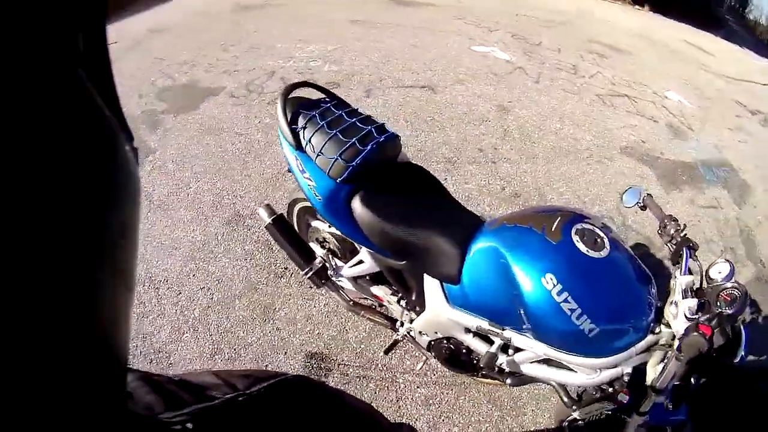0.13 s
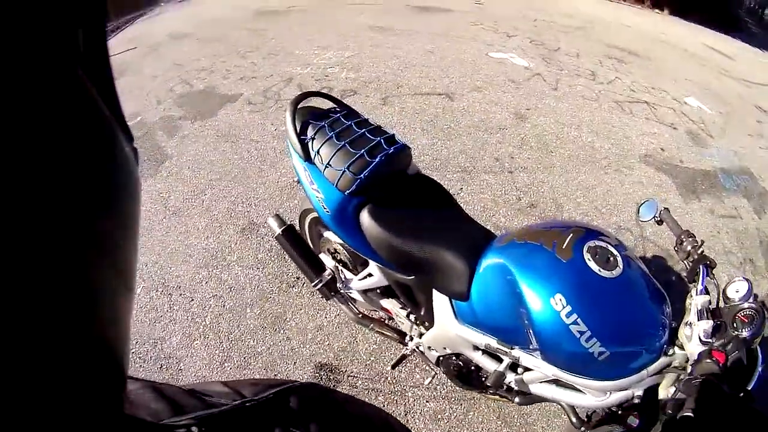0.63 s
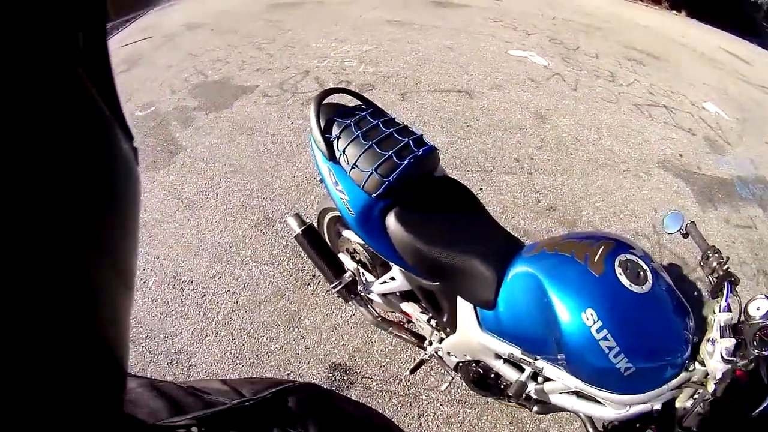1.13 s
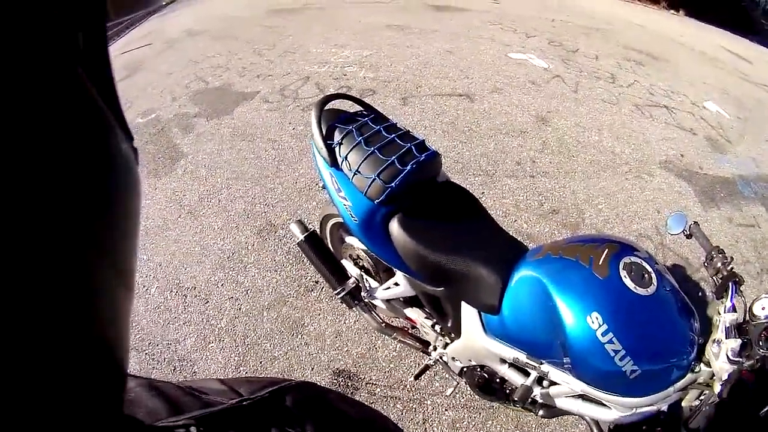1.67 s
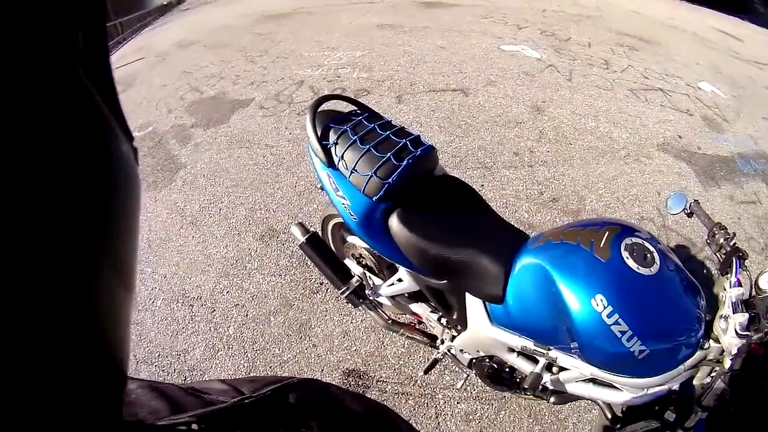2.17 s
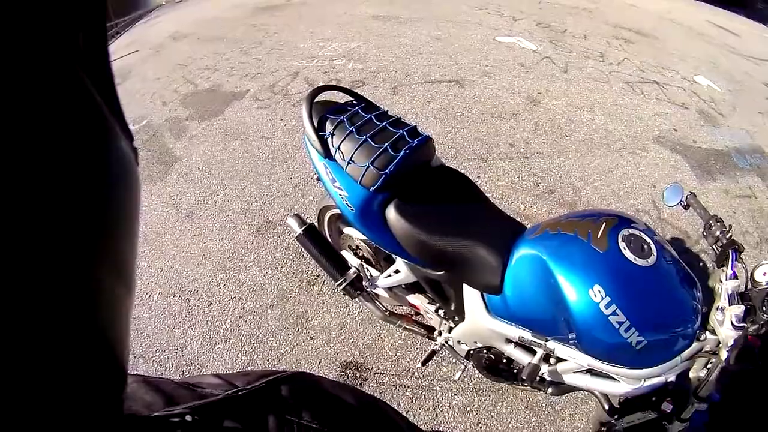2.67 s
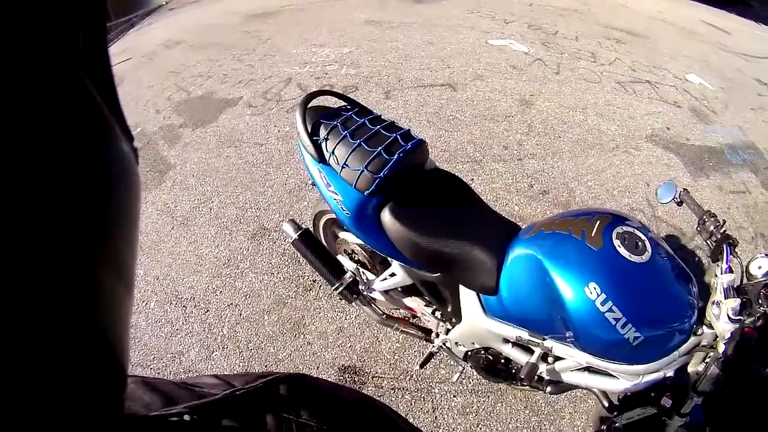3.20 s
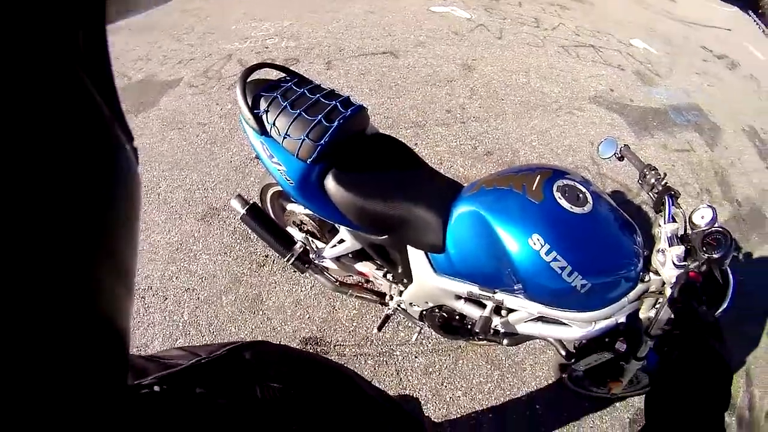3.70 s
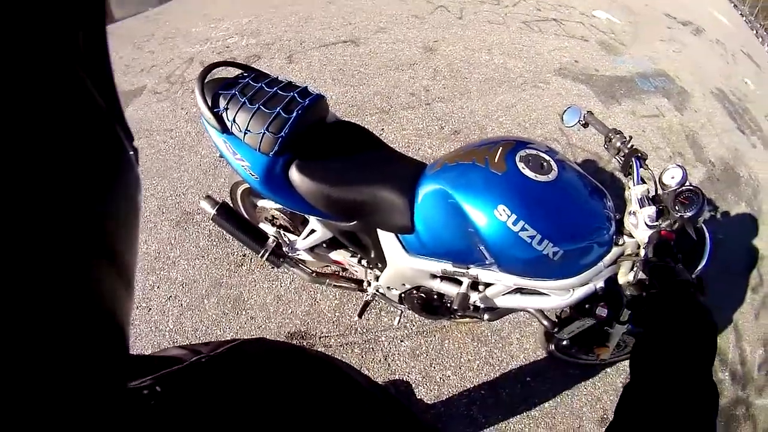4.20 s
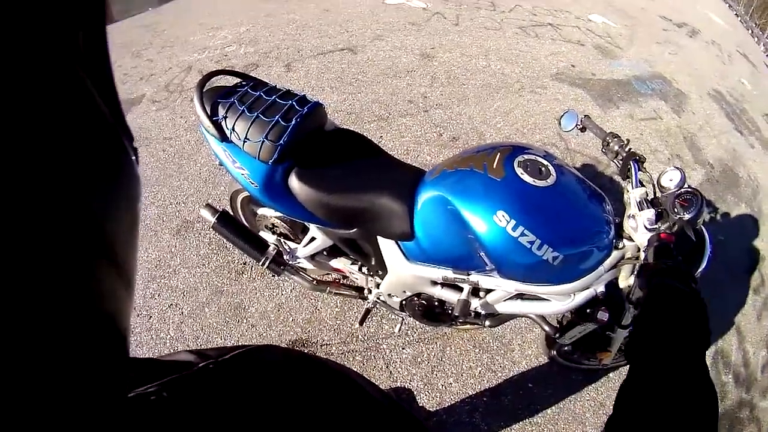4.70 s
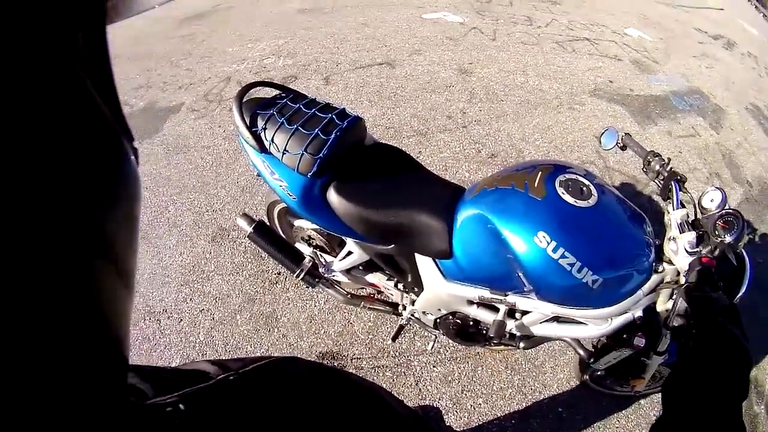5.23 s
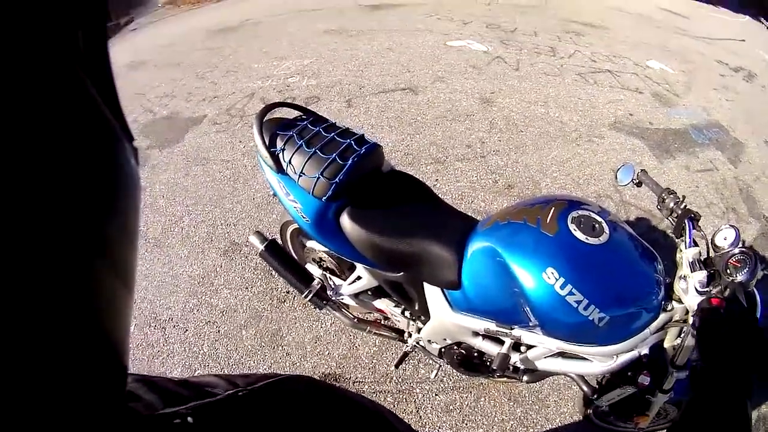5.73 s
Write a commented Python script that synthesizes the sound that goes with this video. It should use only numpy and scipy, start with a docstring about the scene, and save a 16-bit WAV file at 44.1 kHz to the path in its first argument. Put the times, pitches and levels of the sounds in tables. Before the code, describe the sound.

A parked V-twin motorcycle idles with a lumpy open-exhaust rumble, is revved in four sharp blips, and falls back to slow thumping idle.

```python
"""Parked V-twin motorcycle

Heard from beside the seat, an open exhaust idles, is blipped four times and falls back.
The two cylinders fire unevenly; each sends a puff down the pipe that rebounds, echoes and rings pipe and can.
Shaped noise makes the gas rush and burble after each puff, random ticks the valve gear, resonance the case rasp.
Still outdoor air lies beneath, and the small recorder clips the loud puffs flat."""
import sys
import numpy as np
from scipy import signal
from scipy.fft import rfft, irfft
from scipy.io import wavfile
from scipy.ndimage import uniform_filter1d

SR = 44100
rng = np.random.default_rng(int(sys.argv[2]) if len(sys.argv) > 2 else 0)


def store_pcm(level_fs):
    """Save levels as 16-bit WAV."""
    pcm = np.round(np.clip(level_fs, -1, 1) * 32767).astype(np.int16)
    wavfile.write(sys.argv[1], SR, np.atleast_2d(pcm).T)


def gain_from_db(level_db):
    """Turn a decibel level (scalar or array-like) into a linear amplitude factor."""
    decades = np.asarray(level_db, float) / 20
    return 10 ** decades


N = 258602  # length in samples


def coloured(points, x):
    """Spectral shaping: x filtered to the (f/Hz, level/dB) points, then normalised to rms 1."""
    hz, db = np.transpose(points)
    f = np.arange(N // 2 + 1) * SR / N + 1
    gain = gain_from_db(np.interp(np.log(f), np.log(hz), db, left=-90))
    y = irfft(rfft(x) * gain, N)
    return y / y.std()


def ring(x, hz, width_hz):
    """Modal resonance: a click excites one decaying sine; a wider mode dies sooner."""
    pole = np.exp((2j * np.pi * hz - np.pi * width_hz) / SR)
    return signal.lfilter([0, pole.imag], [1, -2 * pole.real, abs(pole) ** 2], x)


def lay(s, size, width_s, shape, count=900):
    """Superposition: the sum of pulses size * shape(time / width_s) placed at the times s."""
    at = np.round(s * SR).astype(int)[:, None] + np.arange(-count // 3, count)
    wave = size[:, None] * shape((at / SR - s[:, None]) / width_s[:, None])
    inside = (at >= 0) & (at < N)
    return np.bincount(at[inside], wave[inside], N)


# discrete reflections from ground and pipe ends:
# (delay/ms for a puff 1 ms wide, front level/dB, rear level/dB)
ECHOES = [(3.29, -9.5, -7.5), (4.96, -21.5, -10), (8.22, -14.5, -17), (16.95, -14.5, -26.5)]
# pipe modes driven by the gas volume: (f/Hz, bandwidth/Hz, level/dB)
PIPE_MODES = [(48.5, 8.6, -3.5), (82.7, 13, -8.5), (110.8, 22, -8)]
# can modes struck by a short pulse just after each dip's lowest point: (f/Hz, bandwidth/Hz, level/dB)
CAN_MODES = [(242.4, 20, 7), (338.3, 64, 20), (448, 56.3, 22.5), (543, 105, 17.5), (646, 105, 22.5),
             (770, 176, 17.5), (1147, 333, 25), (1490, 174, 18), (2500, 250, 20.5)]
# differences between the cylinders, throttle shut: (cycle rate f/Hz, front can drive level/dB,
# rear can drive level/dB, added rear rebound level/dB, echo gain level/dB)
SIDES_SHUT = [(8.8, -1.5, -13, -0.5, 6), (13, -12, -14, -10, 3), (16, -2, -9, 6, 0.5),
              (20.8, -5.5, -10, -4, 4), (23.6, -3, -1, 7, 3.5), (28.3, 2.95, -18.5, -6.5, -5.3),
              (36.2, -3.5, -7, 5.7, 1.7), (46.2, 2.2, -1, 1.5, -0.2)]
# the same columns, throttle open
SIDES_OPEN = [(15, 0.11, -5, .1, .1), (35, 1.2, -7.5, .1, .1), (54, .1, 2, 2.3, 0.092)]


def exhaust(s, db, width_ms, rebound_db, volume_db, rear):
    """Pulse radiation and reflection: each puff is a dip and steep rebound that echoes and excites modes."""
    width_s = np.clip(width_ms, .1, 3) / 1000
    front_can_db, rear_can_db, rear_rebound_db, echo_db = engine_map(SIDES_SHUT, SIDES_OPEN, s)
    rebound = gain_from_db(rebound_db + rear * rear_rebound_db)[:, None]

    def bump(u, after):
        """Gaussian pulse of width 1 before its peak and `after` behind it."""
        return np.exp(-.5 * (u / np.where(u > 0, after, 1)) ** 2)

    def dip(u):
        """Rarefaction: a negative pulse that recovers more slowly than it falls."""
        return -bump(u, 2.04)

    def puff(u):
        """Pressure rebound: the dip is cut off by a later positive pulse."""
        return dip(u) + rebound * bump(u - 2.79, 1.74)

    def strike(u):
        """Impulsive excitation: a short pulse just after the dip's lowest point strikes the can."""
        return -bump(3 * (u - .6), 1)

    out = lay(s, gain_from_db(db), width_s, puff)
    for delay_ms, front_db, rear_db in ECHOES:
        # short puffs are hot puffs: sound runs faster and the echoes come sooner
        delay_s = delay_ms / 1000 * (1000 * width_s) ** 0.11
        level_db = db + echo_db + np.where(rear, rear_db, front_db)
        out += lay(s + delay_s, gain_from_db(level_db), width_s, puff)

    can_db = noise_levels(s)[0] + throttle(s)[1] + misfire_db(s)
    can_db = can_db + np.where(rear, rear_can_db, front_can_db)
    can_drive = lay(s, gain_from_db(can_db), width_s, strike) * 1000 / SR
    # dividing by the width makes the drive follow the gas volume
    volume = gain_from_db(volume_db) / (width_s * np.sqrt(2 * np.pi) * SR)
    pipe_drive = lay(s, volume, width_s, dip)
    for drive, modes in [(can_drive, CAN_MODES), (pipe_drive, PIPE_MODES)]:
        for hz, width_hz, mode_db in modes:
            out -= gain_from_db(mode_db) * ring(drive, hz, width_hz)
    return out


# mean puffs, throttle shut: (cycle rate f/Hz, front level/dB, rear level/dB, width/ms,
# rebound level/dB, gas volume level/dB)
PUFF_SHUT = [(7.24, -36.5, -28.5, 1, -2.5, -36.5), (9.17, -30.5, -34.5, 0.72, -10, -33.5),
             (11.1, -27.5, -31, 0.76, -47, -37.5), (14.3, -25, -26.5, 1.22, -4, -39),
             (19.44, -24, -23.5, 1.18, -14.5, -28.5), (22.4, -18.5, -23.5, 0.55, -20.5, -28.5),
             (26.6, -15.5, -27, 0.7, -6.5, -44.5), (35.6, -15.5, -17, 0.55, -9.5, -39),
             (43.45, -15.5, -14.5, 0.45, -4, -49), (51.9, -11, -12, 0.33, -7.5, -51)]
# the same columns, throttle open
PUFF_OPEN = [(12, -17, -5.5, 0.27, -11, -39), (21.6, -7, -11, 0.34, -5, -30.5),
             (29.3, -10, -13, .31, -1, -32.5), (40, -9, -17.5, 0.26, 3, -32.5),
             (58.3, -17, -6, 0.31, -6.5, -27)]
# puff timing: (cycle rate f/Hz, lag behind the crank with throttle shut/ms,
# share of the cycle to the rear puff when shut/0-1, when open/0-1)
TIMING = [(7, 2.4, .3, .39), (9, 1.2, .36, .39), (14, 1.2, .4, .37), (17.5, 3.5, .345, .367),
          (21, 1.2, .395, .367), (28, 1.2, .39, .392), (33, 1.2, .358, .385), (53, 1.2, .348, .348)]
# puffs off the beat while the throttle snaps shut: (t/s, level/dB, width/ms, rebound level/dB)
POPS = [(1.038, -18, 0.4, -6), (1.0543, -15.5, 0.33, -4.5), (1.0685, -20, 1, -17), (1.588, -11.5, 0.58, 1),
        (1.5929, -17.5, 0.17, -20), (1.611, -14.5, 0.29, 2), (4.736, -21, 0.35, -2.5)]
FIRST_CYCLE = -.085  # engine cycles
STUMBLE_AFTER_S, STUMBLE_S, STUMBLE_WIDTH_MS = 0.029, .011, 0.46  # delay, Gaussian spread, widening
SCATTER_SHUT_DB, SCATTER_OPEN_DB = .5, 2.2  # standard deviations


def firings():
    """Uneven firing: rows (t/s, level/dB, width/ms, rebound/dB, gas volume/dB, rear 0-1) from crank phase."""
    t = np.arange(-SR // 100, N) / SR
    cycles = FIRST_CYCLE + np.cumsum(crank_speed(t)) / SR
    # the front fires on each whole cycle, the rear a share of a cycle later
    whole = np.arange(int(cycles[-1]) + 1)
    front = np.interp(whole, cycles, t)
    lag_ms, shut_share, open_share = by_speed(TIMING, front)
    opened = throttle(front)[0]
    rear_share = shut_share + opened * (open_share - shut_share)
    rear = np.interp(whole + rear_share, cycles, t, right=2 * t[-1])
    s = np.r_[front, rear] + np.tile(lag_ms * (1 - opened), 2) / 1000
    is_rear = np.arange(len(s)) >= len(front)

    front_db, rear_db, width_ms, rebound_db, volume_db = engine_map(PUFF_SHUT, PUFF_OPEN, s)
    opened, strength_db = throttle(s)
    db = np.where(is_rear, rear_db, front_db) + strength_db + misfire_db(s)
    # starved of air just after the throttle shuts, the burns go weak and soft
    for _, shuts, _, front_dip_db, rear_dip_db in BLIPS:
        starved = np.exp(-.5 * ((s - shuts - STUMBLE_AFTER_S) / STUMBLE_S) ** 2)
        db = db + starved * np.where(is_rear, rear_dip_db, front_dip_db)
        width_ms = width_ms + starved * STUMBLE_WIDTH_MS

    # no two burns are quite alike, least so under throttle
    beat = np.c_[s, db, width_ms, rebound_db, volume_db, is_rear]
    spread = SCATTER_SHUT_DB + opened * (SCATTER_OPEN_DB - SCATTER_SHUT_DB)
    column_scale = [.00004, 1, .015, 1, 1, 0]  # s, dB, ms, dB, dB per dB of spread
    beat = beat + rng.standard_normal(beat.shape) * spread[:, None] * column_scale
    # stray puffs carry too little gas to ring the pipe
    pops = np.c_[POPS, np.full(len(POPS), -np.inf), np.zeros(len(POPS))]
    return np.r_[beat, pops]


# single weak burns: (t/s, level/dB)
MISFIRES = [(1.033, -6), (1.325, -3.5), (2.505, -7), (3.537, -1.5), (3.59, -11), (4.707, -6.5),
            (4.782, -8.5), (5.43, -10)]
MISFIRE_S = .008  # Gaussian spread


def misfire_db(s):
    """Incomplete combustion: level change of burns at the times s near each misfire."""
    return sum(weak_db * np.exp(-.5 * ((s - at) / MISFIRE_S) ** 2) for at, weak_db in MISFIRES)


# throttle blips: (opening t/s, shutting t/s, strength level/dB,
# front stumble after shutting level/dB, rear stumble level/dB)
BLIPS = [(0.775, 1.008, -0.08, -29, -10.5), (1.339, 1.57, 0.2, -4, -33), (2.566, 2.848, -0.11, -5, -19),
         (4.43, 4.722, 0.054, -6.5, -7)]
OPEN_S, SHUT_S = .06, .04  # ramp durations


def throttle(s):
    """Piecewise-linear control: throttle opening (0-1) and blip strength in dB at the times s."""
    opened, strength_db = 0, 0
    for opens, shuts, blip_db, *_ in BLIPS:
        ramp = np.clip((s - opens) / OPEN_S, 0, 1) * np.clip(1 + (shuts - s) / SHUT_S, 0, 1)
        opened = opened + ramp
        strength_db = strength_db + ramp * blip_db
    return opened, strength_db


# crank speed, one engine cycle being two turns: (t/s, cycle rate f/Hz)
SPEED = [(-0.01, 8.856), (0.174, 9.314), (0.309, 8.632), (0.779, 8.769), (1.019, 38.834), (1.073, 36.968),
         (1.349, 28.806), (1.565, 55.056), (1.673, 52.985), (2.021, 36.487), (2.435, 19.459),
         (2.606, 15.992), (2.824, 46.219), (2.921, 45.583), (3.366, 26.468), (3.577, 18.353),
         (3.85, 10.365), (4.007, 6.583), (4.074, 8.886), (4.44, 9.496), (4.642, 36.24), (4.716, 43.639),
         (4.824, 42.059), (5.221, 25.5), (5.426, 17.902), (5.87, 6.169)]


def crank_speed(s):
    """Firing periodicity: engine cycles per second, interpolated at the times s."""
    return np.interp(s, *np.transpose(SPEED))


def by_speed(table, s):
    """Speed dependence: columns of a table read at the crank speed of the times s."""
    hz, *columns = np.transpose(table)
    speed = crank_speed(s)
    return np.array([np.interp(speed, hz, column) for column in columns])


def engine_map(shut, wide, s):
    """Load dependence: the shut and open tables blended by throttle opening."""
    opened = throttle(s)[0]
    return (1 - opened) * by_speed(shut, s) + opened * by_speed(wide, s)


# engine levels, throttle shut: (cycle rate f/Hz, can drive level/dB, gas rush level/dB, valve gear level/dB)
NOISE_SHUT = [(7, -82, -100, -87), (9.4, -78, -102, -88), (15, -56.5, -79, -83),
              (20.6, -51.5, -73.5, -79.5), (26.5, -50.5, -72, -75.5), (38.3, -42.5, -64, -69.5),
              (53, -48, -66, -63)]
# the same columns, throttle open
NOISE_OPEN = [(12, -32.5, -81, -66), (21.4, -43.5, -63.5, -83), (30.8, -36.5, -46, -72),
              (37, -38.5, -52, -90), (50, -35.5, -46, -71.5)]


def noise_levels(s):
    """Source strength by speed and load: can drive, gas rush and valve gear in dB."""
    return engine_map(NOISE_SHUT, NOISE_OPEN, s)


# relative spectrum of the gas rush: (f/Hz, level per Hz/dB)
RUSH = [(300, -16), (600, -8), (1000, -6), (1400, 0), (2000, -6), (2700, -6), (5000, -18), (9000, -26),
        (14000, -38)]
RUSH_SCATTER_DB = 3.1  # standard deviation from puff to puff, for rush and burble


def gas(s, db, level_db, decay_s=.004, steady=.1):
    """Turbulent jet noise: a rush bursts out behind each puff and decays exponentially."""
    size = gain_from_db(db + RUSH_SCATTER_DB * rng.standard_normal(len(s)))
    gate = lay(s, size, np.full(len(s), decay_s), lambda u: (u > 0) * np.exp(-np.abs(u)))
    gate /= np.sqrt(uniform_filter1d(gate ** 2, SR // 8)) + 1e-6  # even out the running rms
    return gain_from_db(level_db) * (gate + steady) * coloured(RUSH, rng.standard_normal(N))


# relative spectrum of the burble: (f/Hz, level per Hz/dB)
BURBLE = [(120, -12), (200, 1), (330, 7), (500, -1), (700, -3.5), (1000, -15.5), (1500, -18.5), (2200, -50)]
# burble level, throttle shut: (cycle rate f/Hz, level/dB)
BURBLE_SHUT = [(7, -56), (9, -57), (13, -53), (17, -49.5), (21, -51), (27, -53), (38, -49.5), (53, -56.5)]
BURBLE_OPEN_DB = -43.5  # at every speed
BURBLE_ATTACK_S, BURBLE_DECAY_S = .0015, 0.028


def burble(s, rear, t, rear_db=-5):
    """Low-frequency turbulence: gas swirl rolls on in the can after each puff."""
    level_db = engine_map(BURBLE_SHUT, [(9, BURBLE_OPEN_DB)], t)[0]
    size = gain_from_db(rear_db * rear + RUSH_SCATTER_DB * rng.standard_normal(len(s)))

    def swell(u):
        """Transient envelope: a linear attack times an exponential decay."""
        return np.clip(u * BURBLE_DECAY_S / BURBLE_ATTACK_S, 0, 1) * np.exp(-np.abs(u))

    gate = lay(s, size, np.full(len(s), BURBLE_DECAY_S), swell, count=4000)
    return gain_from_db(level_db) * gate * coloured(BURBLE, rng.standard_normal(N))


# relative spectrum of the valve gear: (f/Hz, level per Hz/dB)
GEAR = [(1500, 5), (2200, -9), (2750, -0.5), (3600, -2), (4700, 4), (5600, -5.5), (6800, -5), (9000, -9.5),
        (11000, -33), (15000, -29)]


def gear(level_db, spread_db=3., share=0.038):
    """Random impact noise: dense small ticks of valves, chains and gears over a thin whirr."""
    struck = rng.random(N) < share  # share of samples that carry a tick
    ticks = rng.standard_normal(N) * struck * gain_from_db(spread_db * rng.standard_normal(N))
    whirr = 0.26 * rng.standard_normal(N)
    return gain_from_db(level_db) * coloured(GEAR, ticks + whirr)


RASP_HZ, RASP_WIDTH_HZ = 2750, 180  # resonance and bandwidth of each of two passes
RASP_DB, RASP_OPEN_DB = -71, -5.5  # level at 45 cycles a second when shut, change when open


def rasp(t, power=8.6):
    """Structural resonance: the case rings on fine clatter, steeply with speed, most when the load comes off."""
    case = ring(rng.standard_normal(N), RASP_HZ, RASP_WIDTH_HZ)
    case = ring(case, RASP_HZ, RASP_WIDTH_HZ)
    level = gain_from_db(RASP_DB + RASP_OPEN_DB * throttle(t)[0])
    return level * (crank_speed(t) / 45) ** power * case / case.std()


# relative spectrum of the outdoor air: (f/Hz, level per Hz/dB)
AIR = [(120, -26.5), (200, 4), (326, -2.5), (376, -6.5), (624, -19), (912, -21), (1980, -33.5), (4640, -48),
       (15000, -66)]
AIR_DB = -61  # rms level


def air():
    """Stationary ambient noise: still outdoor air as steady shaped noise."""
    return gain_from_db(AIR_DB) * coloured(AIR, rng.standard_normal(N))


def scene():
    """Linear superposition of exhaust, gas rush, burble, valve gear, case rasp and air."""
    t = np.arange(N) / SR
    _, rush_db, gear_db = noise_levels(t)
    fired = firings().T
    s, puff_db, *_, rear = fired
    mix = exhaust(*fired)
    mix = mix + gas(s, puff_db, rush_db + throttle(t)[1])
    mix = mix + burble(s, rear, t)
    mix = mix + gear(gear_db) + rasp(t) + air()
    return mix[None]


def band_limit(x):
    """A steep low-pass at the top of the band."""
    return signal.sosfilt(signal.butter(12, 16050, fs=SR, output="sos"), x)


CLIP = .113  # share of full scale
MIC_LOW_HZ, TOP_HZ = 30.3, 12900  # filter corners


def record(dry):
    """Band limiting and saturation: the microphone drops deep bass, the converter clips and dulls the top."""
    heard = signal.lfilter(*signal.butter(1, MIC_LOW_HZ, "high", fs=SR), dry)
    clipped = np.clip(heard, -CLIP, CLIP)
    finished = signal.lfilter(*signal.butter(2, TOP_HZ, fs=SR), clipped)
    return band_limit(finished)


dry = scene()
out = record(dry)
store_pcm(out)
```